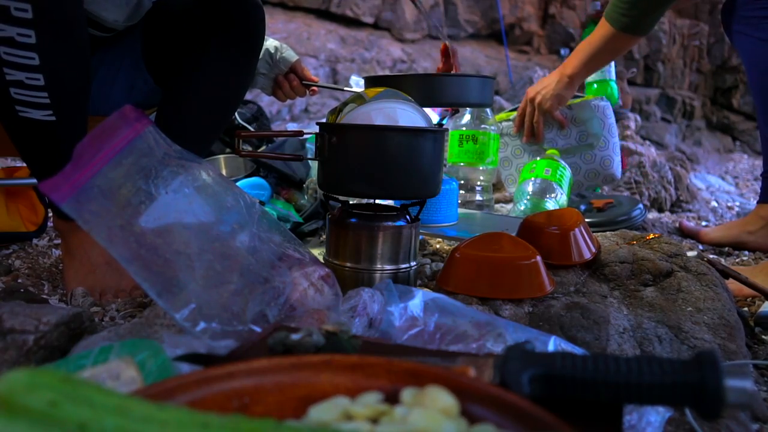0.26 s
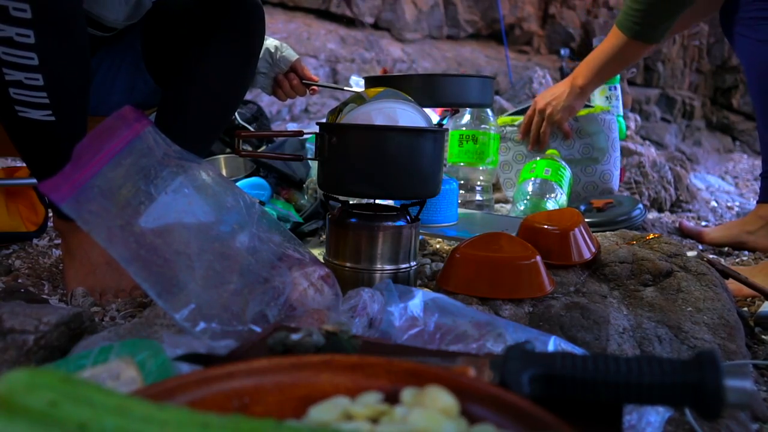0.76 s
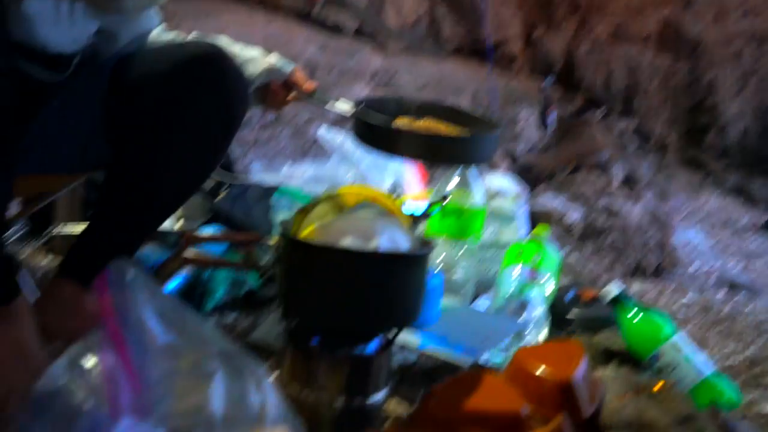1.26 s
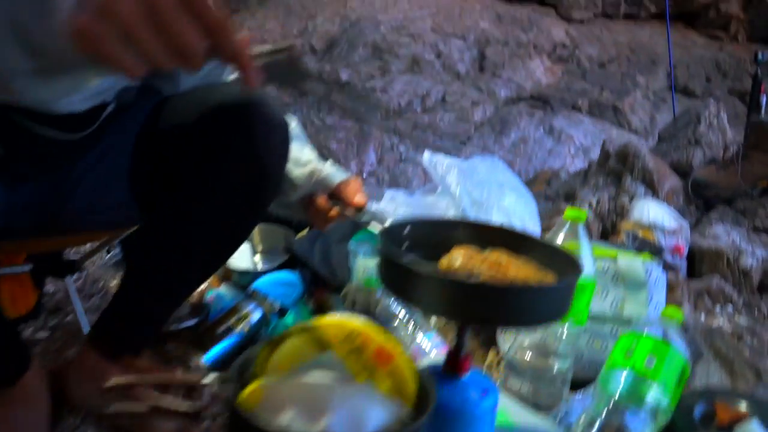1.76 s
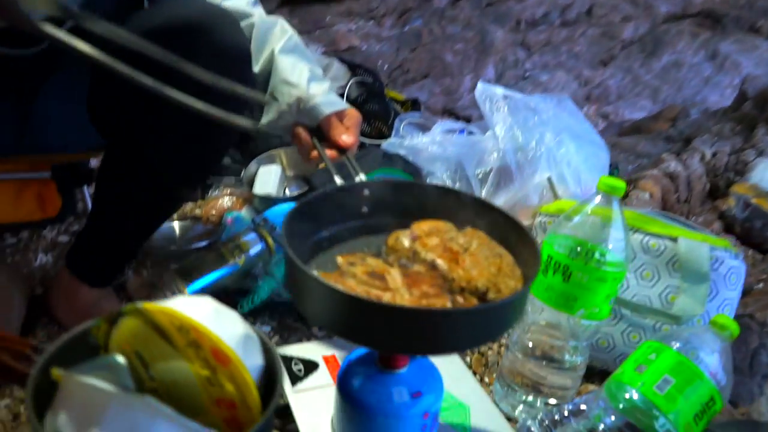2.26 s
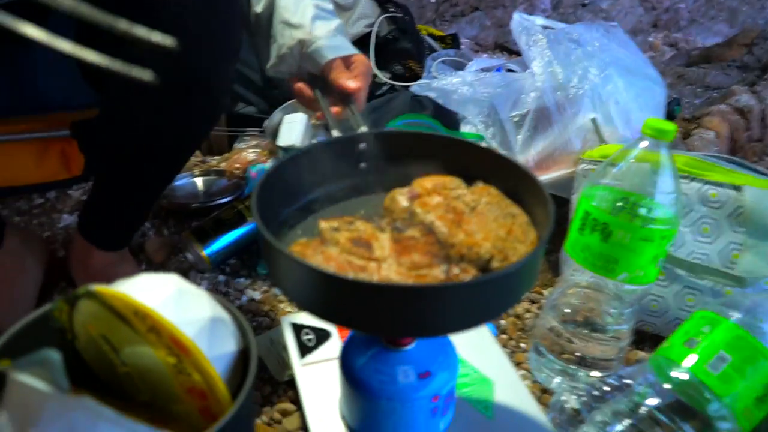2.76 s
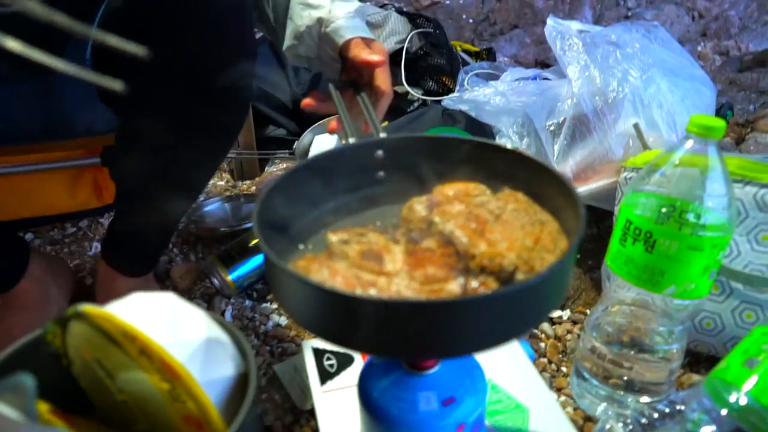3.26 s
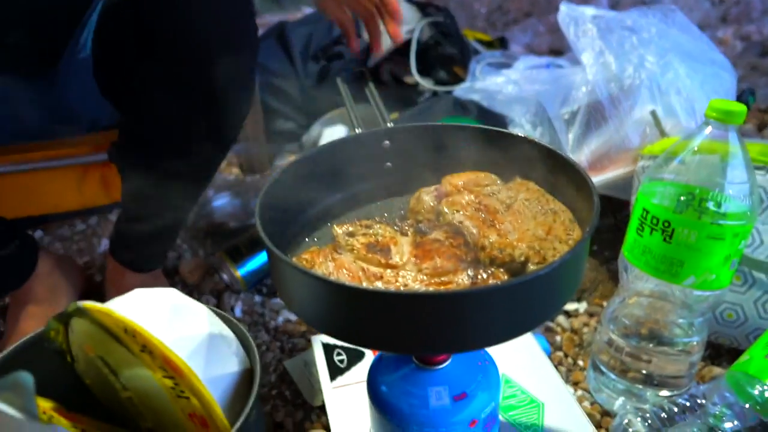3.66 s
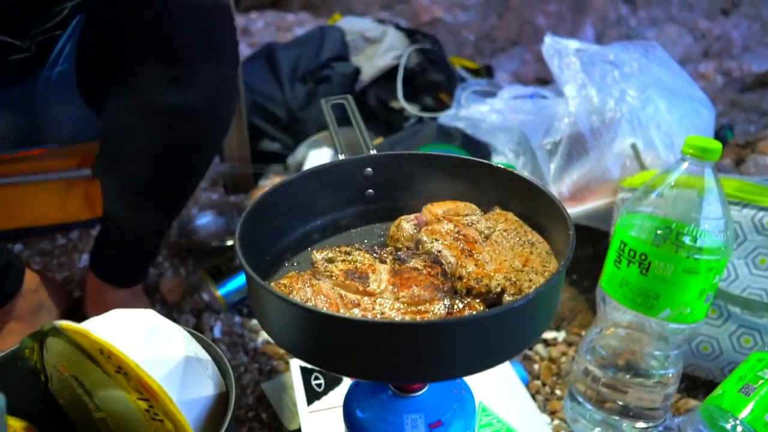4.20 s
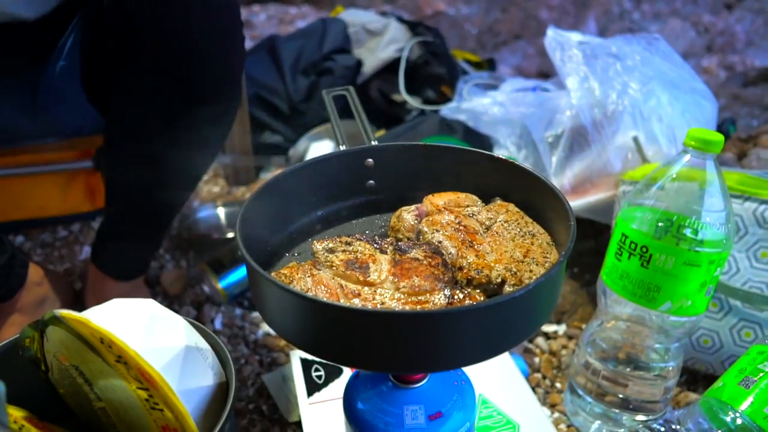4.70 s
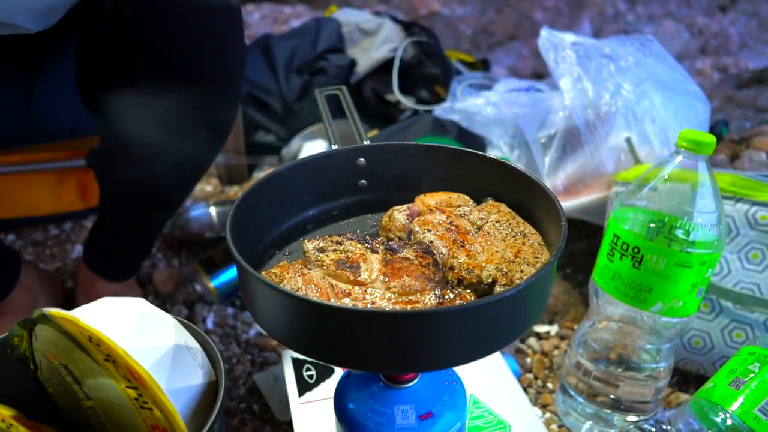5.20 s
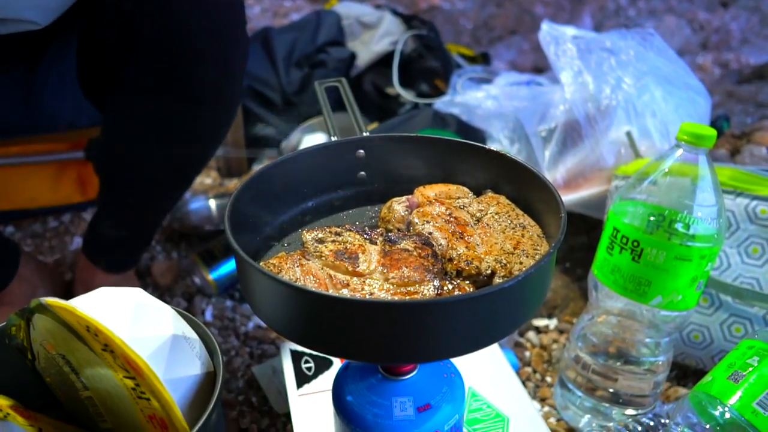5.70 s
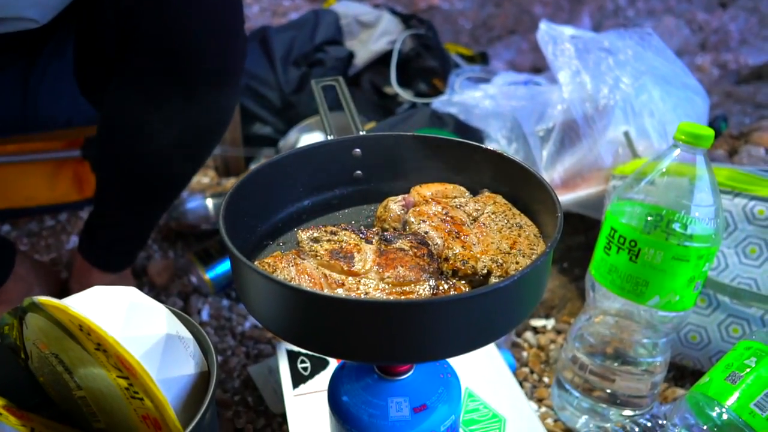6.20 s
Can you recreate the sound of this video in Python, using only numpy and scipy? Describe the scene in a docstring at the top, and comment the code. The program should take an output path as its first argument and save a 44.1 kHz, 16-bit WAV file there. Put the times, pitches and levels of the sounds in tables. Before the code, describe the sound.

A gas camp stove roars steadily under a pot close to the microphone, outdoors, with a hissing jet and a slight ring from the burner. A second burner and a light sizzle of frying meat lie behind it. At about 0.9 seconds steel tongs click once against the pan, with a short echo off rock. At 1.3 seconds the microphone is lifted with a dull bump, and low air buffeting follows as it passes over the pot stove, which fades after 2 seconds. From about 2 seconds the bright, close sizzle of meat in hot oil takes over, above the hollow howl of the flame under the pan. Another soft bump comes near 2.7 seconds. Fat spits in sharp, irregular snaps, with a few duller steam pops. The sizzle is strongest from 2.4 to 3.4 seconds, then slowly eases, still spitting until the end at about 6.5 seconds.

```python
"""Frying meat on a camp stove

Two gas burners roar outdoors: one under a pot close by, one howling in the gap under a pan of meat.
The microphone starts low beside the pot stove, and steel tongs click once against the pan. It is then
lifted and carried over the pan, with air buffeting it. The sizzle takes over and slowly dies down:
water bursts in the hot oil, fat spits and steam pops. Both ears hear the same sound."""
import sys
import numpy as np
from scipy import signal
from scipy.fft import rfft, irfft, next_fast_len
from scipy.io import wavfile

SR = 44100
rng = np.random.default_rng(int(sys.argv[2]) if len(sys.argv) > 2 else 0)


def generate_wav(signal):
    """Clip the signal to [-1, 1] and save it as 16-bit WAV at the path in sys.argv[1]."""
    frames = np.transpose(np.atleast_2d(signal))
    scaled = np.clip(frames, -1, 1) * 32767
    pcm = np.round(scaled).astype(np.int16)
    wavfile.write(sys.argv[1], SR, pcm)


N = 284445
TIME = np.arange(N) / SR
FFT_SIZE = next_fast_len(N + 8192)
FREQS = np.maximum(np.arange(FFT_SIZE // 2 + 1) * SR / FFT_SIZE, 1)
LIFT_S = 1.276  # the microphone is lifted from beside the pot stove

# The tone colour of each noise. Each row: frequency in Hz, level in dB.
AIR_COLOUR = [(4, 0), (9, 6.5), (17, 5), (26, -6), (38, -4.5), (55, -15), (110, -21), (250, -63)]  # air pushing on the microphone
HOWL_COLOUR = [(250, -57), (420, -21.5), (521, -6.5), (583, -2.5), (640, 1), (751, -3.5), (871, -18.5),
               (968, -14), (1050, -15.5), (1150, -16.5), (1500, -44), (2530, -120)]  # the flame in the gap under the pan
RUMBLE_COLOUR = [(18, -29), (30, -38), (43, -8), (97, -12.5), (145, -5), (316, -2), (372, -5), (408, -10),
                 (480, -2), (620, -18), (1060, -120)]  # the low end of that flame
ROAR_BESIDE_COLOUR = [(25, -20), (45, -13), (105, -8), (150, -7), (186, 2.5), (235, -3.5), (325, -1),
                      (500, -8.5), (605, 2), (695, -4.5), (770, 2), (915, -9), (1030, -3.5), (1380, -8),
                      (1500, -21), (1750, -34), (3500, -60)]  # the pot stove from the side
ROAR_ABOVE_COLOUR = [(35, -63), (60, -33), (91, -10.5), (380, -6), (431, -20), (571, 0), (657, 0.5),
                     (810, -12.5), (985, 1), (1130, -22), (1320, -2.5), (1460, -23), (1700, -16),
                     (2210, -38), (3740, -120)]  # the pot stove from above
JET_COLOUR = [(880, -33), (1500, -10), (1690, -15), (2000, -2), (2660, -10), (3590, -7), (3880, -9),
              (5220, -7), (7840, -11.5), (12200, -22), (16000, -28)]  # the hiss of its gas jet
FIZZ_COLOUR = [(1760, -37.5), (3000, -12), (3830, -6), (5440, -6), (5920, -3.5), (6670, -5), (8520, 0.5),
               (10500, -10.5), (13500, -4), (15200, -12.5), (16000, -1)]  # tiny bursts on the hot oil
SPUTTER_COLOUR = [(650, -40.5), (1100, -8.5), (1320, -4), (1460, 2), (1660, 2.5), (1850, 0), (2050, 4.5),
                  (2450, -3.5), (2650, -0.5), (3100, -4.5), (3840, -3.5), (4600, -13), (5980, -21),
                  (10100, -120)]  # larger bursts of steam from under the meat
ROCK_ECHO_COLOUR = [(1200, -23), (2500, -5), (8500, 1), (15000, -11)]
SMALL_DROP_COLOUR = [(300, -32), (1500, -11), (4000, 2), (6500, -1), (8500, 12), (10300, -18),
                     (13300, 1), (16000, -13)]
BIG_DROP_COLOUR = [(300, -18), (1500, -6), (4000, 11), (6500, 4), (8500, 1), (10300, -12),
                   (13300, -4), (16000, -15)]

# How sounds rise and fall at the microphone. Each row: time in seconds, level in dB.
AIR_LEVELS = [(0, -36), (0.2, -32), (0.4, -41), (0.74, -28), (1.0, -47), (1.3, -25), (1.75, -30.5),
              (3.25, -33), (4.0, -46.5), (6.45, -53)]  # buffeting air
HOWL_LEVELS = [(1.3, -27.0), (1.55, -27.0), (1.82, -22), (2.3, -28), (2.7, -25.5), (3.1, -26.0),
               (3.6, -23.5), (4.85, -26.5), (6.0, -29.0), (6.45, -30.5)]  # the pan burner after the lift
FRYING_BEFORE_LIFT = [(0, -28), (0.15, -29.5), (0.22, -34), (0.56, -47.5), (0.66, -38), (0.86, -33),
                      (1.15, -32.5), (1.27, -32.0)]
FRYING_AFTER_LIFT = [(1.29, -43), (1.4, -37), (1.55, -41.5), (1.87, -36), (2.05, -28.5), (2.4, -25),
                     (3.4, -26), (4.8, -32.5), (6.05, -35.0), (6.45, -38.5)]

# Short hits. Each row: start in seconds, level in dB.
HAND_BUMPS = [(1.2765, -12), (2.685, -16)]  # the hand knocks the microphone
TONG_TOUCHES = [(.8653, 3.5), (.8670, -11), (.8684, -11), (.8711, -20)]  # one touch on the pan and its bounces
LOUD_SPITS = [(2.0704, -4), (2.4104, -5), (2.792, -1), (3.077, 0), (3.119, 1), (3.2413, -5), (3.694, 0),
              (3.7604, -5), (3.8197, 1), (4.2253, 1.5), (4.336, -11), (4.4912, -7), (4.7591, -4),
              (5.1714, -10), (5.315, -1.5), (5.3577, 1), (5.5279, -7), (5.9813, -6), (6.0234, -6),
              (6.0776, -6), (6.096, -0.5), (6.4009, -8)]  # the loudest spits of fat

# Dull pops of steam under the meat. Each row: start in seconds, level in dB, pitch in Hz.
STEAM_POPS = [(1.3854, -8, 2520), (2.015, -2.5, 2040), (2.0249, -16, 1930), (2.2993, -5.5, 2030),
              (2.624, -6, 1570), (3.5369, -10, 2100), (4.336, -15, 1570), (6.078, -15, 2100)]
# The ring of the burner head near 1 to 1.4 kHz, and above 2 kHz a hollow comb of peaks as the roar also reaches
# the microphone off the ground. Each row: pitch in Hz, width in Hz, level in dB.
NOTES_BESIDE_STOVE = [(990, 72, 2.5), (1266, 25, -2.5), (1370, 28, 1.5), (2006, 74, -7.5), (2480, 67, -6),
                      (2890, 35, -5.5), (3094, 60, -6), (3510, 54, -6.5), (4910, 110, -11.5), (5230, 220, -7)]
# The notes of tongs and pan. Each row: pitch in Hz, level in dB, seconds to fade by 60 dB.
TONG_NOTES = [(2560, -23, 0.039), (2810, -20, 0.067), (3550, -26, 0.033), (4970, -14.5, 0.012),
              (5360, -9, 0.0055), (7700, -21, 0.039), (8670, -18.5, .022), (10300, -37, 0.027)]


def from_db(db):
    """Turn decibels into a number to multiply by."""
    return 10 ** (np.asarray(db) / 20)


def level_curve(rows):
    """Join rows of time and level with straight lines."""
    return np.interp(TIME, *np.transpose(rows))


def swell(at_s, width_s):
    """A bell-shaped rise to 1 and back around a moment."""
    return np.exp(-((TIME - at_s) / width_s) ** 2 / 2)


def drift(rate_hz):
    """A random wobble with a typical size of 1, mostly slower than the given rate."""
    spectrum = rfft(rng.standard_normal(FFT_SIZE)) / (1 + (FREQS / rate_hz) ** 2)
    wobble = irfft(spectrum, FFT_SIZE)[:N]
    return wobble / wobble.std()


def coloured(sound, colour):
    """Filter a sound so that it takes on a tone colour."""
    hz, db = np.transpose(colour)
    gain = from_db(np.interp(np.log(FREQS), np.log(hz), db))
    # fold the filter in time, so that nothing rings before the sound that sets it off
    cepstrum = irfft(np.log(gain), FFT_SIZE)
    cepstrum[1:FFT_SIZE // 2] *= 2
    cepstrum[FFT_SIZE // 2 + 1:] = 0
    return irfft(rfft(sound, FFT_SIZE) * np.exp(rfft(cepstrum)), FFT_SIZE)[:N]


def levelled(sound, band_hz):
    """Scale a sound so that the part inside a band has a typical size of 1."""
    in_band = (FREQS > band_hz[0]) & (FREQS < band_hz[1])
    return sound / irfft(rfft(sound, FFT_SIZE) * in_band, FFT_SIZE)[:N].std()


def flow_noise(colour, band_hz, flutter_db=0.0):
    """The rush of swirling gas, with an optional flutter in its level."""
    noise = rng.standard_normal(N) * from_db(flutter_db * drift(25))
    return levelled(coloured(noise, colour), band_hz)


def breathy_note(hz, width_hz):
    """Noise keeps a resonance sounding around one pitch."""
    decay = np.exp(-np.pi * width_hz * 2 / SR)
    stage = [1, 0, -1, 1, -2 * decay * np.cos(2 * np.pi * hz / SR), decay ** 2]
    tone = signal.sosfilt([stage, stage], rng.standard_normal(N))
    return tone / tone.std()


def gliding_note(hz, width_hz):
    """A narrow band of noise whose pitch moves."""
    smoothing = signal.butter(2, width_hz / 2, fs=SR, output="sos")
    sway = signal.sosfilt(smoothing, rng.standard_normal((2, N)))
    phase = 2 * np.pi * np.cumsum(hz) / SR
    tone = sway[0] * np.cos(phase) + sway[1] * np.sin(phase)
    return tone / tone.std()


def ring(clicks, hz, fade_s):
    """Each click starts a pure note that falls by 60 dB in fade_s."""
    decay = from_db(-60 / (fade_s * SR))
    step = 2 * np.pi * hz / SR
    return signal.lfilter([0, np.sin(step)], [1, -2 * decay * np.cos(step), decay ** 2], clicks + 1e-18)


def clicks_at(rows):
    """One click for each row of start and level."""
    clicks = np.zeros(N)
    for start_s, db in rows:
        clicks[min(round(start_s * SR), N - 1)] += from_db(db)
    return clicks


def buffeting(resting_db=-1.0, jolt_db=3.0, settle_s=0.25):
    """Lumps of air hit the microphone and surge at the lift; the hand adds dull thuds."""
    lumps = levelled(coloured(rng.standard_normal(N), AIR_COLOUR), band_hz=(10, 60))
    jolt = np.exp(-np.abs(TIME - LIFT_S) / settle_s)
    motion_db = np.where(TIME < LIFT_S, resting_db, jolt_db * jolt)
    thuds = ring(clicks_at(HAND_BUMPS), hz=30, fade_s=0.041)
    return from_db(level_curve(AIR_LEVELS) + motion_db) * lumps + thuds


def pan_burner(far_db=-30.5, shade_db=-4.5, clear_s=2.4, ease_s=4.07, ease_db_per_s=2.5):
    """The flame howls under the pan, clearer once past the pot, over a rumble that eases off late."""
    hidden_db = shade_db * np.clip(clear_s - TIME, 0, 1)
    howl_db = np.where(TIME < LIFT_S, far_db, level_curve(HOWL_LEVELS) + hidden_db)
    rumble_db = -37.5 - ease_db_per_s * np.maximum(TIME - ease_s, 0)
    howl = flow_noise(HOWL_COLOUR, band_hz=(480, 820))
    rumble = flow_noise(RUMBLE_COLOUR, band_hz=(130, 420), flutter_db=-0.6)
    return from_db(howl_db) * howl + from_db(rumble_db) * rumble


def passing_over_pot(climb_hz_per_s=160, fall_octaves_per_s=0.65):
    """As the microphone passes, the stove's ring climbs, its hiss slides down and its jet whistles."""
    ringing = gliding_note(965 + climb_hz_per_s * np.maximum(TIME - 1.6, 0), width_hz=110)
    hiss = gliding_note(2500 * 2 ** (-fall_octaves_per_s * (TIME - LIFT_S)), width_hz=310)
    whistle = breathy_note(3800, width_hz=160)
    return (from_db(-34) * swell(at_s=1.7, width_s=0.53) * ringing
            + from_db(-33.5) * swell(at_s=1.51, width_s=0.17) * hiss
            + from_db(-32) * swell(at_s=1.775, width_s=0.046) * whistle)


def pot_stove(rise_db_per_s=1.2, move_on_s=1.87, fall_db_per_s=10.5, jet_leaves_s=2.04):
    """A roaring flame, a ringing burner head and a hissing jet, heard from the side, then from above."""
    beside_db = -28 + rise_db_per_s * TIME
    above_db = -28.5 - fall_db_per_s * np.maximum(TIME - move_on_s, 0)
    beside = from_db(beside_db) * flow_noise(ROAR_BESIDE_COLOUR, band_hz=(880, 1430))
    above = from_db(above_db) * flow_noise(ROAR_ABOVE_COLOUR, band_hz=(880, 1430), flutter_db=1.5)
    jet = from_db(-31) * flow_noise(JET_COLOUR, band_hz=(1500, 16000), flutter_db=1.46)
    hollow_notes = sum(from_db(db - 33.5) * breathy_note(hz, width) for hz, width, db in NOTES_BESIDE_STOVE)
    lifted = np.clip((TIME - LIFT_S) / 0.01 + 0.5, 0, 1)  # from 0 to 1 in 10 ms
    near_jet = 1 / (1 + np.exp((TIME - jet_leaves_s) / 0.059))
    return (1 - lifted) * (beside + hollow_notes) + lifted * (above + passing_over_pot()) + near_jet * jet


def tongs(echo_fade_s=0.29):
    """Steel clicks and bounces on the pan, and the rocks scatter a short echo."""
    touches = clicks_at(TONG_TOUCHES)
    click = sum(from_db(db + 1) * ring(touches, hz, fade_s) for hz, db, fade_s in TONG_NOTES)
    age_s = TIME - TONG_TOUCHES[0][0]
    fading = (age_s > 0) * from_db(-60 * np.abs(age_s) / echo_fade_s)
    echo = coloured(rng.standard_normal(N), ROCK_ECHO_COLOUR)
    return click + from_db(-19.5) * fading * echo / echo.std()


def over_pan(arrive_s=1.8, width_s=0.2):
    """Rises from 0 to 1 as the microphone arrives over the pan."""
    return 1 / (1 + np.exp((arrive_s - TIME) / width_s))


def frying_db():
    """How strong the frying is at the microphone."""
    return np.where(TIME < LIFT_S, level_curve(FRYING_BEFORE_LIFT), level_curve(FRYING_AFTER_LIFT))


def steam_pops():
    """Pockets of steam escape from under the meat, each with a very short ring."""
    return sum(ring(clicks_at([(start_s, db - 0.5)]), hz, fade_s=0.0041)
               for start_s, db, hz in STEAM_POPS)


def fat_spits(lesser_per_s=8.3, spread_db=5.5, droplets_per_s=1500, spatter_fade_s=0.035):
    """Drops of fat snap: the loud ones scatter droplets, and lesser ones come at random."""
    starts = rng.random(N) < lesser_per_s * over_pan() / SR
    lesser = starts * from_db(frying_db() + 20.5 + spread_db * rng.standard_normal(N))
    loud = from_db(-0.5) * clicks_at(LOUD_SPITS)
    decay = from_db(-60 / (spatter_fade_s * SR))
    fading = signal.lfilter([1], [1, -decay], loud + 1e-18)
    droplets = rng.standard_normal(N) * (rng.random(N) < droplets_per_s / SR)
    snaps = loud + lesser + from_db(-21) * fading * droplets / droplets.std()
    is_big = rng.random(N) < 0.5  # bigger drops sound duller
    return coloured(snaps * ~is_big, SMALL_DROP_COLOUR) + coloured(snaps * is_big, BIG_DROP_COLOUR)


def bursts(per_s, spread_db, max_spreads=5.2):
    """Bubbles burst at random, many small and a few large; the average power is the same at any rate."""
    sizes = from_db(spread_db * np.minimum(rng.exponential(1, N), max_spreads))
    signs = rng.choice([-1, 1], N)
    starts = rng.random(N) < per_s / SR
    return sizes * signs * starts / np.sqrt(per_s)


def facing_pan(fizz, treble_hz=9800, treble_db=3.5, overall_db=-2.0):
    """The fizz turns brighter while the microphone looks straight into the pan."""
    treble = irfft(rfft(fizz, FFT_SIZE) / (1 + (treble_hz / FREQS) ** 10), FFT_SIZE)[:N]
    facing = swell(at_s=3.13, width_s=0.59)
    brighter = fizz + treble * (from_db(treble_db * facing) - 1)
    return from_db(overall_db * facing) * brighter


def rim_flare():
    """The hiss flares up as the microphone first clears the rim of the pan."""
    return from_db(-27) * swell(at_s=2.05, width_s=0.069) * breathy_note(7900, width_hz=900)


def sizzle(far_per_s=17000, near_per_s=4200, steam_db=-3.0, ease_s=5.16, ease_db_per_s=1.3):
    """Water bursts in hot oil, in clumps, over a hiss of steam: a high fizz and a lower sputter."""
    level_db = frying_db()
    # from afar the bursts merge into a hiss; over the pan fewer, nearer ones stand out
    per_s = far_per_s + (near_per_s - far_per_s) * over_pan()
    clumps = from_db(0.9 * drift(45))
    ticks = bursts(per_s, spread_db=3.6)
    large = bursts(per_s * 0.6, spread_db=3.0, max_spreads=4.6)
    # each tiny bubble rings for about ten cycles, at a pitch set by its size
    bubbles = sum(hz * ring(bursts(per_s / 20, spread_db=3.8), hz, fade_s=10 / hz)
                  for hz in np.geomspace(3000, 15000, 14))
    fizz = ticks / ticks.std() + from_db(-0.5) * bubbles / bubbles.std()
    fizz += from_db(steam_db) * rng.standard_normal(N)
    fizz = from_db(level_db + 3.5) * levelled(coloured(fizz * clumps, FIZZ_COLOUR), band_hz=(7000, 16000))

    sputter = large / large.std() + from_db(steam_db) * rng.standard_normal(N)
    sputter = levelled(coloured(sputter * clumps, SPUTTER_COLOUR), band_hz=(1400, 3000))
    sputter_db = -28.5 + 0.47 * (level_db - level_db.max())  # swings less than the fizz
    sputter_db += 3 * swell(at_s=1.99, width_s=0.21)  # clears the rim of the pan sooner
    sputter_db -= ease_db_per_s * np.maximum(TIME - ease_s, 0)
    return facing_pan(fizz) + from_db(sputter_db) * sputter + rim_flare()


def scene():
    """Everything meets at one microphone in the open air."""
    mono = pot_stove() + pan_burner() + sizzle() + fat_spits() + steam_pops() + tongs() + buffeting()
    return np.stack([mono, mono])


def record(dry, ceiling=0.9, cutoff_hz=15750):
    """Round off the tallest peaks and cut away the highest treble."""
    rounded = dry / (1 + (dry / ceiling) ** 6) ** (1 / 6)
    low_pass = signal.ellip(12, 0.1, 90, cutoff_hz, fs=SR, output="sos")
    return signal.sosfilt(low_pass, rounded)


dry = scene()
out = record(dry)
generate_wav(out)
```